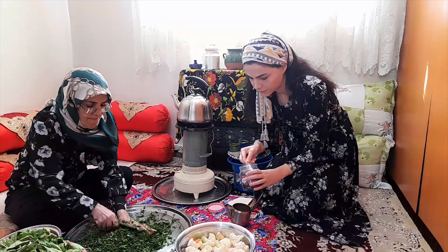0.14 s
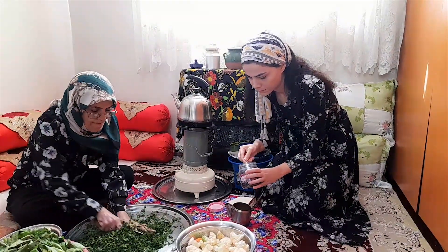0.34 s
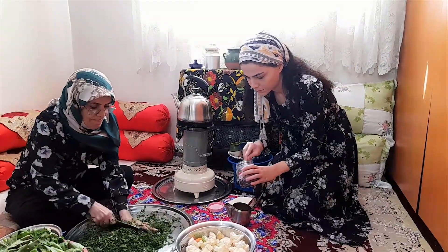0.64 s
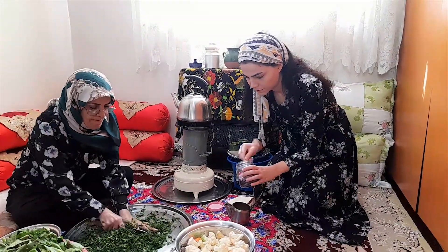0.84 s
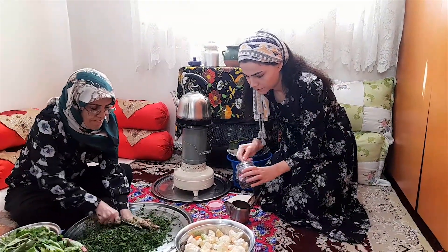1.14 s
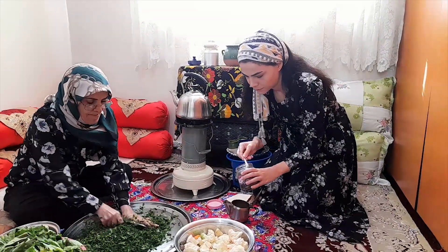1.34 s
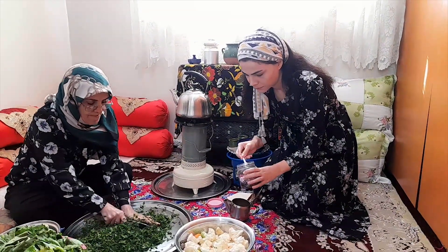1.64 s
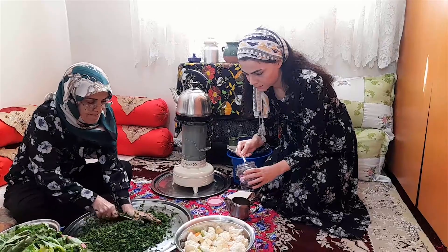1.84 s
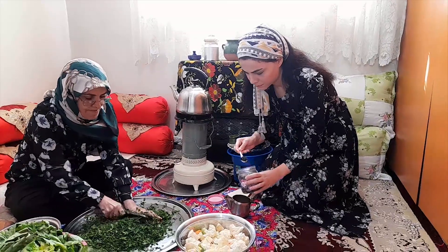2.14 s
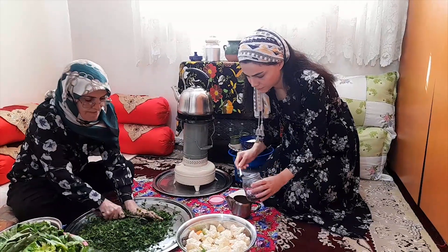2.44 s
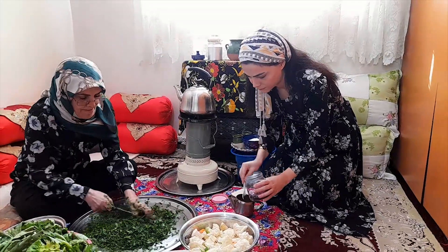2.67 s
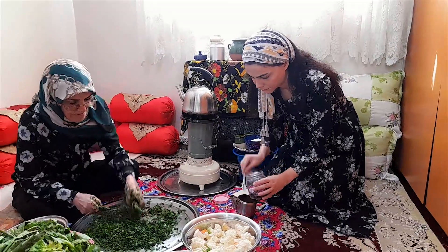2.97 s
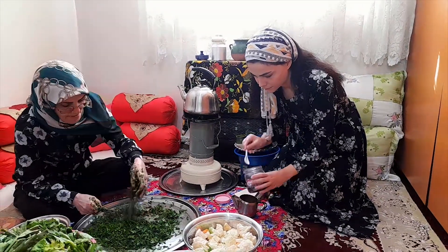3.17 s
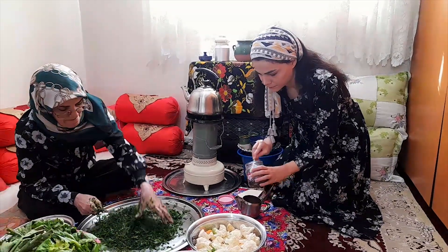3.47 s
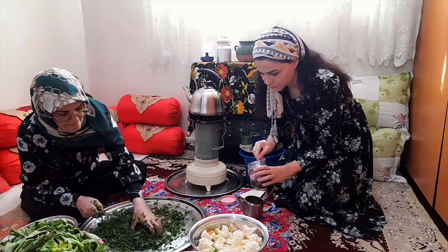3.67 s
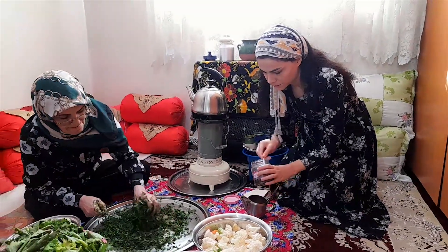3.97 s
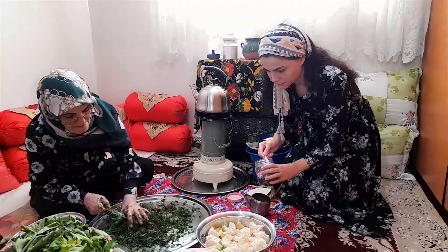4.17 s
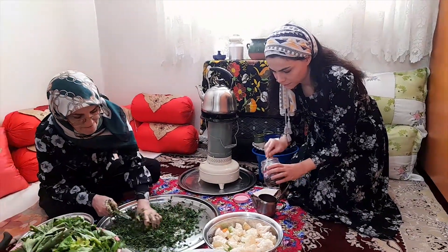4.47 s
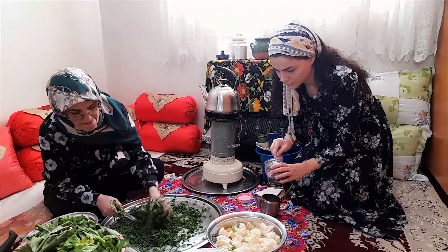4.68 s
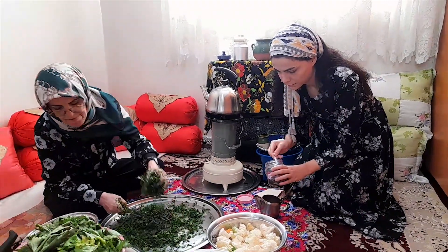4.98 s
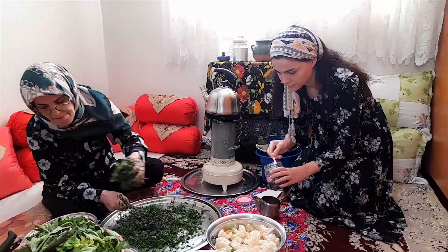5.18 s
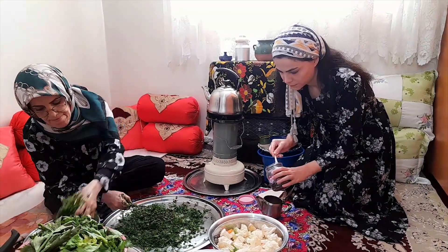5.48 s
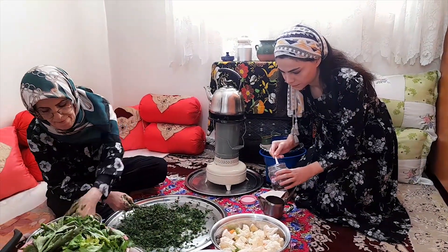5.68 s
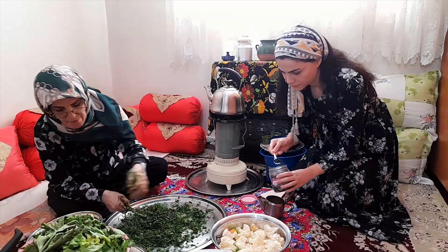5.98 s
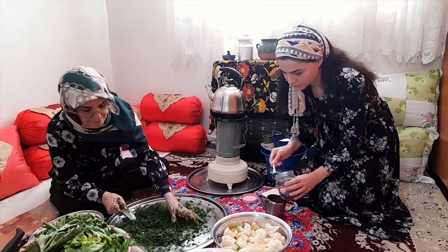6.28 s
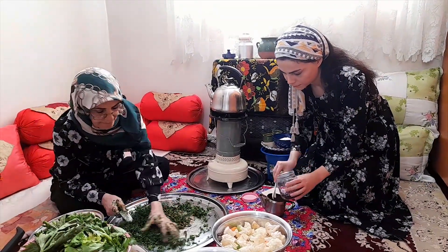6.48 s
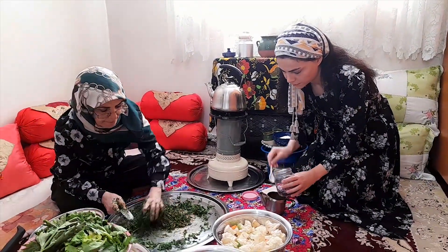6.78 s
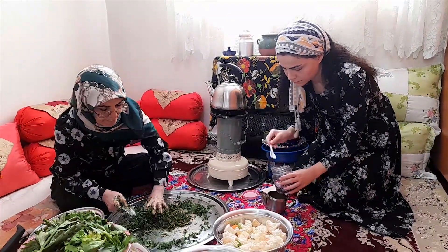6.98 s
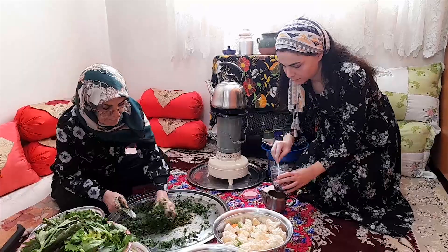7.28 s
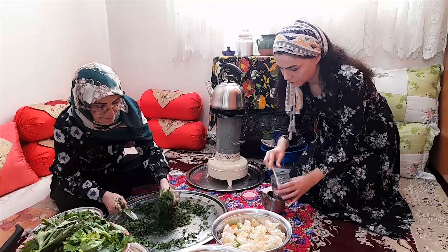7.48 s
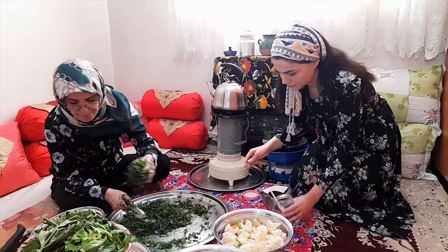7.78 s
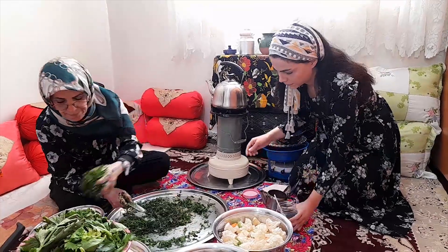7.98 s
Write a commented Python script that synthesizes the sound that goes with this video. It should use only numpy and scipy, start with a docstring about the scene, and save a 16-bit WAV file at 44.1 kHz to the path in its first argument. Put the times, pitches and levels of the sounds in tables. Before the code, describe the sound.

A knife crunches through bunches of fresh greens over a metal tray in slowing strokes, then a hand rustles wet leaves in a small quiet room.

```python
"""In a small soft room, a knife saws through bunches of fresh greens over a wide metal tray.
Then a hand rakes, lifts and drops the leaves, and the blade scrapes metal twice.
Breaking fibres are dense random clicks; the same kind of clicks, through resonances, make the tray boom,
the blade ring and short rubs sing. Single stems snap as decaying bursts over a wavering low hum.
Two microphone ports a few centimetres apart hear it all."""
import sys
import numpy as np
from scipy import signal
from scipy.fft import rfft, irfft
from scipy.io import wavfile
from scipy.ndimage import uniform_filter1d

SR = 44100
rng = np.random.default_rng(int(sys.argv[2]) if len(sys.argv) > 2 else 0)


def to_wav(sig):
    """Store sig (one row per channel, or 1-D mono) as 16-bit WAV at the path in sys.argv[1].

    Samples outside -1..1 are clipped; the rate is SR.
    """
    pcm = np.clip(np.atleast_2d(sig), -1, 1) * 32767
    pcm = np.round(pcm).astype(np.int16)
    wavfile.write(sys.argv[1], SR, pcm.T)  # frames by channels


N = 358091
T = np.arange(N) / SR  # time of every sample [s]


def undb(db):
    """Turn decibels into an amplitude factor."""
    return 10 ** (np.asarray(db) / 20)


def unit(x):
    """Scale to an average (RMS) strength of 1."""
    return x / np.sqrt(np.mean(x ** 2))


def band(x, lo_hz, hi_hz, order=3):
    """Keep the pitches between two edges."""
    sos = signal.butter(order, [lo_hz, hi_hz], "band", fs=SR, output="sos")
    return signal.sosfilt(sos, x)


def colour(x, points, size=4096):
    """Filter through (frequency [Hz], gain [dB]) points, built from the cepstrum so nothing sounds early."""
    hz, db = np.transpose(points)
    f = np.maximum(np.arange(size // 2 + 1) * SR / size, 1)
    log_gain = np.interp(np.log(f), np.log(hz), db) * np.log(10) / 20
    cepstrum = irfft(log_gain)
    # folding the second half onto the first makes the filter causal
    cepstrum[1:size // 2] *= 2
    cepstrum[size // 2 + 1:] = 0
    response = irfft(np.exp(rfft(cepstrum)))
    return signal.fftconvolve(x, response)[:N]


def resonate(x, peaks):
    """Add up (frequency [Hz], width [Hz], level [dB]) resonances with alternating signs."""
    out = 0
    for k, (hz, width_hz, db) in enumerate(peaks):
        b, a = signal.iirpeak(hz, hz / width_hz, SR)
        out = out + (-1) ** k * undb(db) * signal.lfilter(b, a, x)
    return out


def walk(rate):
    """Wandering level: random steps, `rate` per second, smoothed twice."""
    k = int(SR / rate)
    steps = np.repeat(rng.standard_normal(N // k + 1), k)
    return 0.97 * uniform_filter1d(uniform_filter1d(steps, k), k)[:N]


def crackle(per_s, spread_db):
    """Clicks at random moments, many small and a few large."""
    hit = rng.random(N) < per_s / SR
    size = np.minimum(rng.exponential(size=N), 4.0)
    sign = np.sign(rng.standard_normal(N))
    return unit(hit * sign * undb(spread_db * size))


def curve(table):
    """Read the columns of a time table at every sample."""
    s, *columns = np.transpose(table)
    return [np.interp(T, s, column) for column in columns]


def burst(s, db, rise_s, fall_s, hold_s=0., gain_db=0.):
    """Gain of one movement: swell up to s, hold, fade; rise and fall are times for 20 dB."""
    held = np.clip((T - s) / max(hold_s, 1e-4), 0, 1)
    rise_db = -20 * np.maximum(s - T, 0) / rise_s
    fall_db = -20 * np.maximum(T - s - hold_s, 0) / fall_s
    return undb(db + gain_db * held + rise_db + fall_db)


def blend(moves):
    """Add movements (gain, boom [dB], stem [dB], crispness [dB]) in power, giving four layer gains."""
    power = 0
    for gain, *over_db in moves:
        layers = np.array([gain * undb(db) for db in (0, *over_db)])
        power = power + layers ** 2
    return np.sqrt(power)


# balance of faint air and microphone hiss: (frequency [Hz], relative level [dB per Hz])
AIR_COLOUR = [(100, -12.5), (137, -19.5), (300, -22.5), (540, -34.5), (830, -43.5), (1600, -41.5),
              (2200, -44), (3500, -51), (6500, -41.5), (7600, -48), (8500, -47), (10500, -43.5),
              (13000, -39.5), (15800, -41.5)]
AIR_DB = -71.5  # around which the level wanders
# low hum and the rumble under it: (time [s], hum level [dB], rumble level [dB])
HUM_LEVELS = [(0.0, -48.5, -46), (0.2, -68, -69), (0.38, -53, -54), (0.63, -68, -69.5), (0.85, -60, -53),
              (1.74, -58, -58), (1.85, -67.5, -71), (2.03, -59, -59), (2.87, -62.5, -59), (3.2, -69, -70.5),
              (3.42, -63.5, -59), (3.91, -64.5, -69), (4.14, -62.5, -61.5), (4.85, -71.5, -69.5),
              (5.06, -62, -61), (5.4, -66.5, -73.5), (5.79, -62.5, -58), (6.08, -67, -65.5),
              (6.67, -60.5, -68), (6.87, -70, -73), (7.15, -59.5, -62), (8.12, -70.5, -68.5)]


def background():
    """Air and hiss shared by the ports in the bass only, over noise bands for a wavering hum and rumble."""
    shared, left, right = (colour(rng.standard_normal(N), AIR_COLOUR) for _ in range(3))
    air = np.array([left, right])
    b, a = signal.butter(1, 250, fs=SR)
    air = air + signal.lfilter(b, a, shared - air)
    air = band(air, 110, 19000, order=2)
    air = unit(air) * undb(AIR_DB + .8 * walk(1.0))
    hum_db, rumble_db = curve(HUM_LEVELS)
    # two noises common to both ports, then one for each port
    noise = rng.standard_normal((4, N))
    own = noise[2:]
    hum = unit(band(noise[0] + 0.1 * own, 89.7, 112.4, order=2)) * undb(hum_db)
    rumble = unit(band(noise[1] + 0.88 * own, 52.6, 89.6, order=2)) * undb(rumble_db)
    deep = unit(band(own + noise[1], 40, 59.6, order=2)) * undb(rumble_db - 11.0)
    return air + (hum + rumble + deep) * undb([[-1.3], [1.3]])  # right port hears more hum


# resonances of the tray: (frequency [Hz], width [Hz], relative level [dB])
TRAY_MODES = [(148.5, 16.2, 7), (232, 37, -2), (284, 48, 1.5), (361, 37, 1), (396, 40, -2), (500, 58.5, 0),
              (602, 102, -3), (784, 59, -4.5), (955, 145, -9.5)]
STEM_HZ, LEAF_HZ, CRISP_HZ = (900, 2900), (2900, 7750), (7900, 17000)


def leaves(points, gains, per_s, spread_db, clump_db, push_hz):
    """Fibres break in clumps, thin leaf high and thick stem lower; slower slips push the tray."""
    def fibres():
        clumps_db = clump_db * (walk(80) + 0.28 * walk(30))
        return colour(crackle(per_s, spread_db) * undb(clumps_db), points)

    leaf, stem = fibres(), fibres()
    slips = crackle(900, 2.42) * undb(clump_db * walk(50))
    boom = unit(resonate(band(slips, push_hz, 3900, order=2), TRAY_MODES))
    rustle = unit(band(leaf, *LEAF_HZ, order=7))
    thick = unit(band(stem, *STEM_HZ, order=4))
    crisp = unit(band(leaf, *CRISP_HZ, order=7))
    return np.sum(gains * (rustle, boom, thick, crisp), axis=0)


# knife strokes: (time the edge touches [s], time fully in [s], crackle level [dB], cut length [s],
# tray boom over the crackle [dB], stems over the crackle [dB])
STROKES = [(-0.1, -0.02, -38, 0.019, 5.2, 1), (0.322, 0.37, -38, 0.025, 5.8, -0.5),
           (0.723, 0.778, -39, 0.023, 8.6, -2.5), (1.119, 1.167, -43, 0.027, 7.5, 1),
           (1.53, 1.566, -43.5, 0.044, 4.6, -3), (1.914, 1.953, -51.5, 0.069, 2.9, 1),
           (2.308, 2.368, -53.5, 0.027, 3.5, -2)]
STROKE_RISE_S, STROKE_FALL_S = 0.054, 0.051  # time for 20 dB
# crispness over the crackle at the touch, its change, and how long the change takes
STROKE_CRISP_DB, STROKE_DULLS_DB, STROKE_DULLS_S = -1.5, -8.5, .11
# blade and bunch shifted between cuts: (time [s], crackle level [dB], rise for 20 dB [s],
# fall for 20 dB [s], crispness over the crackle [dB])
BLADE_SHIFTS = [(0.102, -55, 0.0033, 0.13, -6), (0.229, -59, 0.11, 0.08, -6), (0.301, -69, 0.032, 0.09, 6),
                (0.5, -60, 0.11, 0.13, -8), (0.638, -57.5, 0.14, 0.066, -5),
                (0.912, -57.5, 0.54, 0.12, -14), (1.019, -54, 0.094, 0.064, -5.5),
                (1.28, -53.5, 0.38, 0.061, -9.5), (1.48, -65, 0.27, 0.28, -5),
                (1.851, -61.5, 0.19, 0.13, -8), (2.153, -65, 0.097, 0.06, -9),
                (2.241, -60, 0.028, 0.09, -6.5), (2.526, -70.5, 0.092, .1, -2)]
SHIFT_BOOM_DB, SHIFT_STEM_DB = -6.5, -7.5  # over the crackle
# balance of the cutting crackle: (frequency [Hz], relative level [dB per Hz])
CUTTING_COLOUR = [(410, -19), (700, -16), (874, -24.5), (995, -15), (1740, -15.5), (2070, -13), (2510, -15),
                  (6680, -17.5), (8020, -24), (12000, -20), (15800, -21.5)]


def knife():
    """Each stroke bites and bursts through the bunch, crispest as it enters; then the blade is drawn back."""
    moves = []
    for touch, s, db, hold_s, boom_db, stem_db in STROKES:
        gain = (T >= touch) * burst(s, db, STROKE_RISE_S, STROKE_FALL_S, hold_s)
        dulled = np.clip((T - touch) / STROKE_DULLS_S, 0, 1)
        moves.append((gain, boom_db, stem_db, STROKE_CRISP_DB + STROKE_DULLS_DB * dulled))
    for *shape, crisp_db in BLADE_SHIFTS:
        moves.append((burst(*shape), SHIFT_BOOM_DB, SHIFT_STEM_DB, crisp_db))
    return leaves(CUTTING_COLOUR, blend(moves), per_s=5000, spread_db=3.15, clump_db=2.74, push_hz=60)


# short pitched rubs of leaf, blade or finger on the tray: (time [s], length [s], time to fade 60 dB [s],
# frequency [Hz], width of each of two resonances in a row [Hz], level [dB])
TRAY_RUBS = [(0.087, 0.012, 0.17, 5360, 1210, -42.5), (0.324, 0.017, 0.081, 706, 250, -56),
             (0.674, 0.062, .1, 675, 350, -55.5), (1.119, 0.034, 0.11, 625, 200, -50),
             (1.517, 0.054, 0.12, 650, 250, -50), (2.573, 0.017, .1, 3620, 600, -62.5),
             (2.603, .04, .15, 676, 200, -60.5), (2.747, 0.039, 0.23, 2063, 60, -58),
             (2.754, 0.076, 0.23, 5820, 400, -60.5), (4.56, 0.091, 0.36, 660, 302, -59),
             (5.65, 0.095, 0.33, 2010, 258, -61), (5.726, 0.15, .2, 3230, 50, -87),
             (5.75, 0.6, .2, 1610, 44.7, -88.5), (6.337, 0.09, 0.28, 1260, 150, -72.5),
             (6.492, 0.078, .1, 5700, 250, -68.5), (6.49, 0.075, 0.13, 1970, 150, -76),
             (7.007, 0.05, .1, 1560, 500, -66), (7.3, 0.053, 0.71, 595, 149, -65),
             (7.558, 0.02, 0.14, 660, 380, -49.5)]


def rubs():
    """Friction noise in one narrow resonance: it swells while the contact lasts, then fades."""
    out = 0
    friction = crackle(6000, 2.3) * undb(0.89 * walk(54))
    for s, length_s, t60_s, hz, width_hz, db in TRAY_RUBS:
        mode = [(hz, width_hz, 0)]
        tone = unit(resonate(resonate(friction, mode), mode))
        rise = np.sin(np.pi / 2 * np.clip((T - s) / (0.83 * length_s), 0, 1))
        fade_db = -60 * np.maximum(T - s - length_s, 0) / t60_s
        out = out + tone * rise * undb(db + fade_db)
    return out


# single stems that break: (time [s], crack level before colouring [dB], push on the tray over it [dB])
STEM_SNAPS = [(0.099, -31.5, -14), (0.334, -35, -13), (0.3613, -23.5, -2.5), (0.7123, -41, -21),
              (0.7301, -36, -5.5), (0.7492, -31, -2), (0.7815, -27, -1), (0.9202, -42, -11),
              (1.1246, -42.5, -1), (1.1415, -33.5, -8), (1.1584, -30, -3), (1.169, -33, -16),
              (1.5321, -51, 8), (1.5571, -30, 1), (1.919, -44, -5), (1.9605, -45, -12), (2.36, -44, -7),
              (2.728, -36.5, -34), (2.7547, -41, -31), (3.416, -50.5, -26), (3.7095, -44, -11.5),
              (3.7523, -39, -15), (3.9737, -51, -22), (4.0277, -50, -34), (4.1403, -48, -30),
              (4.155, -48, -13), (4.4472, -41, -22), (4.719, -53, -21), (4.8238, -57, -22),
              (4.8586, -46.5, -30), (4.9822, -47.5, -17), (5.3123, -48.5, -30), (5.7027, -49, -4.5),
              (6.3987, -51.5, -7), (6.6128, -44, -5.5), (7.0584, -43, -8), (7.5619, -33, -16),
              (8.106, -54, -13)]
# tone of a snap: (frequency [Hz], gain [dB])
SNAP_TONE = [(500, -25.5), (2000, -10.5), (5000, -2.5), (7200, -2.5), (8300, -14.5), (13000, -12),
             (16000, -10.5)]
CRACK_S, PUSH_S = 0.004, .0004  # decay of the crack; its sharp start and the tray push


def snaps():
    """A sharp crack that frays into noise, and one short push on the tray."""
    crack, knock = np.zeros(N), np.zeros(N)
    for s, db, push_db in STEM_SNAPS:
        after = np.maximum(T - s, 0)
        decay = np.exp(-after / CRACK_S) + 0.72 * np.exp(-after / PUSH_S)
        crack += undb(db) * (T >= s) * decay
        knock += undb(db + push_db) * after / PUSH_S * np.exp(1 - after / PUSH_S)
    frayed = crack * np.sign(rng.standard_normal(N))
    return colour(frayed, SNAP_TONE) + undb(8) * resonate(knock, TRAY_MODES)


# hand movements in the leaves: (time of the peak [s], rustle level [dB], rise for 20 dB [s],
# fall for 20 dB [s], then over the rustle: tray boom [dB], stems [dB], crispness [dB])
HAND_MOVES = [(2.715, -53.5, 0.12, 0.12, -1.5, 4, -10), (2.81, -58.5, 0.15, 0.063, -0.5, -2, 7.5),
              (3.34, -72.5, 0.012, .3, -1.5, 2, -13), (3.416, -64.5, 0.02, 0.33, -7.5, -16, -5),
              (3.62, -61.5, 0.24, .3, -5, -13, -4.5), (3.69, -61, 0.074, 0.18, -2, -3.5, -2),
              (3.772, -47, 0.11, 0.05, -14, -9.5, -9.5), (3.89, -58.5, .2, 0.15, -21, -12, -7),
              (3.975, -59, 0.082, .06, -19, -13, -12), (4.039, -47.5, .02, 0.066, -23, -12.5, -9),
              (4.085, -56, 0.11, 0.057, -21, -8, -9.5), (4.143, -49, .008, .08, -26, -16, -6),
              (4.19, -55.5, 0.11, 0.043, -15, -14, -3.5), (4.42, -68.5, 0.12, 0.06, 1.5, -3, -0.5),
              (4.446, -50, .01, 0.068, -12.5, -12, -8), (4.6, -72.5, 0.24, 0.28, 0, 2, 4),
              (4.737, -57, 0.11, 0.18, -16, -9, -7.5), (4.877, -52.5, 0.29, 0.12, -34, -19.5, -9.5),
              (4.985, -67.5, .03, 0.32, -17, -20, -4), (5.13, -69, 0.42, 0.13, -31, -13, -3),
              (5.32, -70, 0.13, 0.17, -26, -11, -8), (5.5, -78, .3, 0.32, -3, -6.5, -2),
              (5.67, -69, .05, 0.057, 5, -1, 2), (5.711, -48, 0.027, 0.082, -13, -18, -7.5),
              (6.262, -77, 0.0089, .6, 10.5, -7.5, 3), (6.52, -70.5, 0.25, .1, -9, -7, 5),
              (6.63, -59.5, 0.14, 0.093, 2, -2.5, 1.5), (7.072, -54.5, 0.035, 0.16, -0.5, 0, -4),
              (7.19, -69.5, 0.29, 0.063, 3.5, 1, 3.5), (7.346, -73, 0.23, 0.12, 1, 0, 2.5),
              (7.51, -79.5, 0.11, 0.097, 4, -4, -2), (7.57, -55, 0.0089, 0.062, 7, -2, -4),
              (7.943, -78.5, 0.12, .5, -22, -16, -9), (8.12, -63, 0.057, .1, -16, -18, -7)]
STIR_DB, STIR_BOOM_DB = -94, 13.5  # sleeves and loose leaves that never quite rest
# balance of the rustle: (frequency [Hz], relative level [dB per Hz])
RUSTLE_COLOUR = [(410, -24), (700, -16), (1100, -15), (1660, -13), (2070, -7.5), (2480, -12), (4230, 0.5),
                 (5710, -1.5), (7040, -3.5), (8340, -27), (15800, -21)]


def hand():
    """Wet leaves raked and dropped; a light push stirs the higher tray modes."""
    moves = [(burst(*row[:4]), *row[4:]) for row in HAND_MOVES]
    stir = (undb(STIR_DB + walk(10)), STIR_BOOM_DB, 3.0, -2.5)
    gains = blend(moves + [stir])
    return leaves(RUSTLE_COLOUR, gains, per_s=3000, spread_db=4.55, clump_db=3.4, push_hz=330)


# blade edge dragged on metal: (time of contact [s], level then [dB], length [s], gain over the drag [dB])
DRAGS = [(2.706, -55, .012, -6), (2.728, -44, 0.067, 5), (6.385, -66, 0.11, -12), (6.522, -54.5, 0.092, -5)]
# resonances of the blade: (frequency [Hz], width [Hz], relative level [dB])
BLADE_MODES = [(12000, 140, -17), (12640, 160, -3.5), (13300, 170, -12), (15000, 150, -1.5),
               (15600, 180, -5)]
DRAG_RISE_S, DRAG_FALL_S = .004, 0.03  # time for 20 dB


def scrape():
    """Stick-slip ticks ring the high modes of the blade over a broad metallic hiss."""
    ticks = crackle(3000, 1.7) * undb(1.1 * walk(120))
    ring = unit(resonate(ticks, BLADE_MODES))
    hiss = undb(-3.0) * unit(band(ticks, 11900, 15000, order=2))
    gain = sum(burst(s, db, DRAG_RISE_S, DRAG_FALL_S, hold_s, gain_db)
               for s, db, hold_s, gain_db in DRAGS)
    return gain * (ring + hiss)


ROOM_T60_S, ROOM_DB = 0.22, 4  # time to fade 60 dB; echoes over the direct sound
# close echoes off tray, bowls and floor: time to fade 60 dB, and start level over the late tail
NEAR_T60_S, NEAR_DB = 0.018, 6
SHARED_BELOW_HZ = 340


def room(x, count=5, dwell_s=.06):
    """Direct sound and a diffuse tail, shared in the bass; the source hops among places with own echoes."""
    t = np.arange(int(.4 * SR)) / SR
    b, a = signal.butter(1, SHARED_BELOW_HZ, fs=SR)
    fade = undb(-60 * t / ROOM_T60_S) + undb(NEAR_DB - 60 * t / NEAR_T60_S)
    k = int(dwell_s * SR)
    place = np.repeat(rng.integers(count, size=N // k + 1), k)[:N]
    wet = 0
    for p in range(count):
        # one tail common to both ports, then one for each
        tails = rng.standard_normal((3, len(t))) * fade * (t > .001)
        tails /= np.sqrt(np.sum(tails ** 2, axis=1, keepdims=True))
        tails = tails[1:] + signal.lfilter(b, a, tails[:1] - tails[1:])
        here = np.sqrt(np.abs(uniform_filter1d(1. * (place == p), k // 2)))
        wet = wet + signal.fftconvolve((here * x)[None], tails, axes=1)[:, :N]
    lag = 7  # samples by which the right port hears it later
    direct = np.array([x, np.roll(x, lag)])
    return (direct + undb(ROOM_DB) * wet) / np.hypot(1, undb(ROOM_DB))


# where the work happens: (time [s], left minus right level [dB])
WORK_PLACE = [(0.0, -1.5), (2.89, -2), (4.0, -2.5), (5.15, -3), (6.08, 0), (6.63, -2), (7.85, -1.5),
              (8.12, -3)]


def scene():
    """Put greens and scrapes in the room, each with its left-right balance, over the background."""
    side = np.array([[.5], [-.5]])
    balance_db = curve(WORK_PLACE)[0]
    greens = room(knife() + rubs() + snaps() + hand()) * undb(balance_db * side + 1.0)
    metal = room(scrape()) * undb(3.6 * side + 1.5)
    return background() + greens + metal


LEFT_TOP_DB = 2  # the left port hears more of the treble
TOP_HZ = 15780


def record(dry):
    """The microphones lose the deepest bass, lean left in the treble and cut the top steeply."""
    dry = signal.sosfilt(signal.butter(3, 45, "high", fs=SR, output="sos"), dry)
    b, a = signal.butter(1, 7500, "high", fs=SR)
    treble = signal.lfilter(b, a, dry)
    lean = undb(LEFT_TOP_DB * np.array([[.5], [-.5]]))
    dry = dry + treble * (lean - 1)
    return signal.sosfilt(signal.ellip(12, .2, 80, TOP_HZ, fs=SR, output="sos"), dry)


dry = scene()
out = record(dry)
to_wav(out)
```